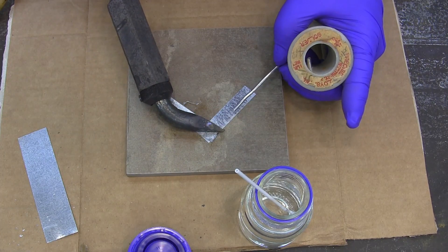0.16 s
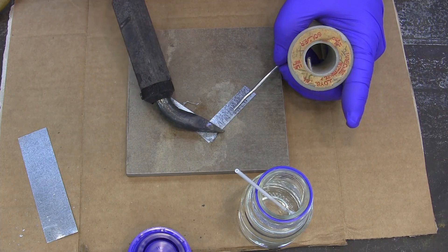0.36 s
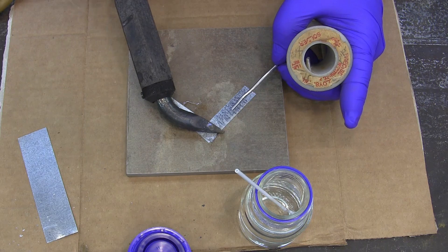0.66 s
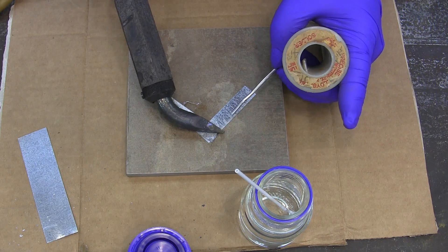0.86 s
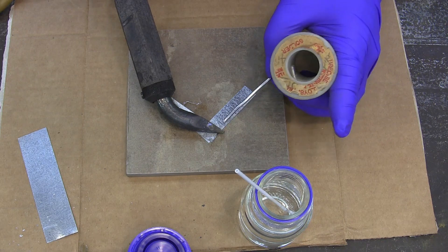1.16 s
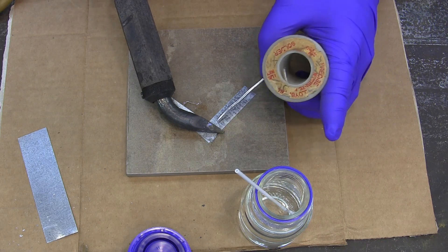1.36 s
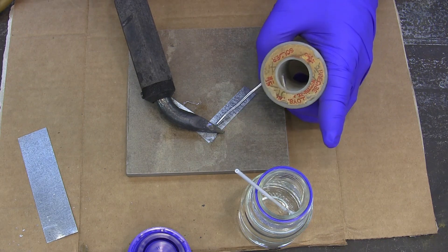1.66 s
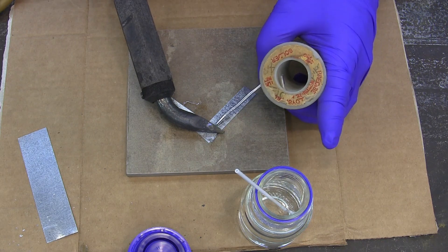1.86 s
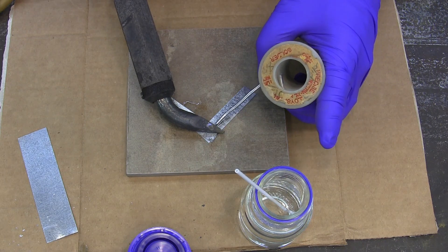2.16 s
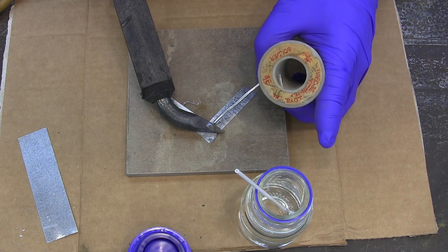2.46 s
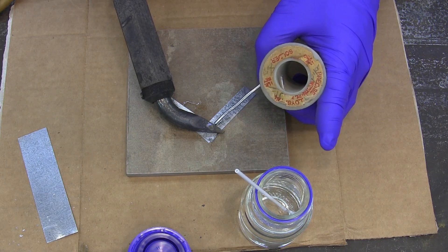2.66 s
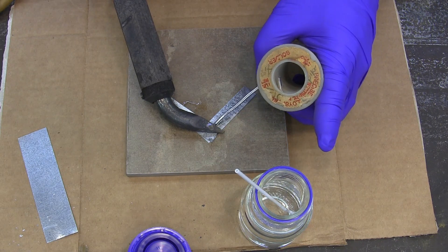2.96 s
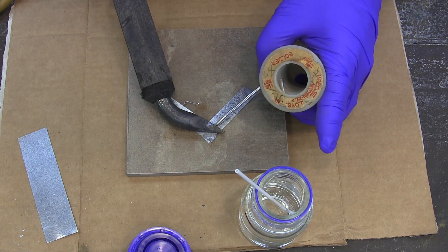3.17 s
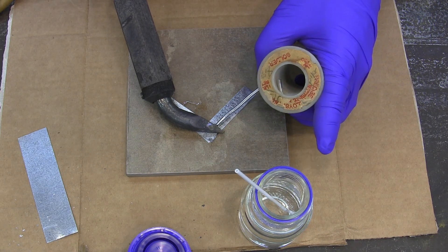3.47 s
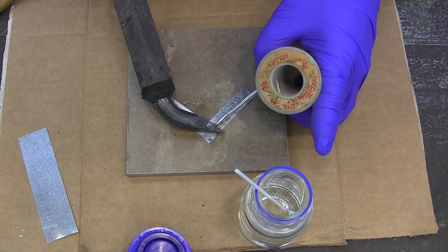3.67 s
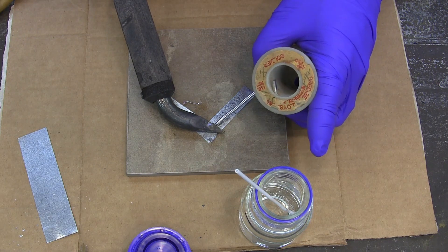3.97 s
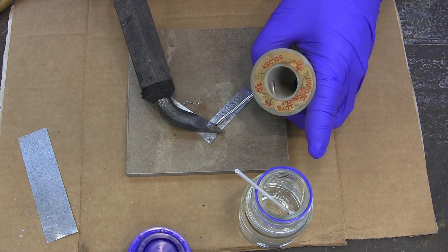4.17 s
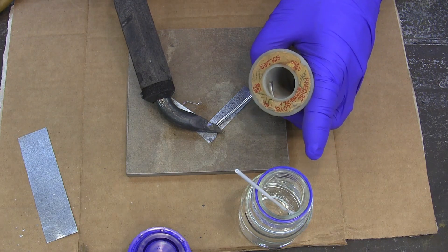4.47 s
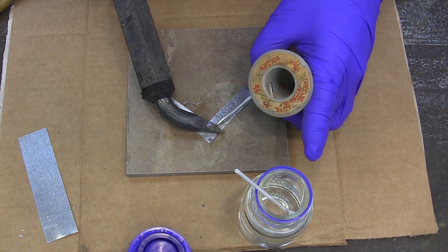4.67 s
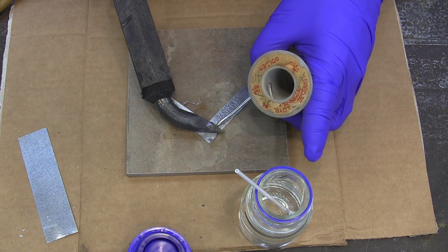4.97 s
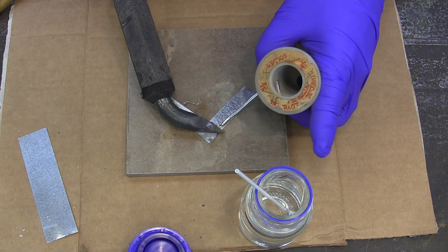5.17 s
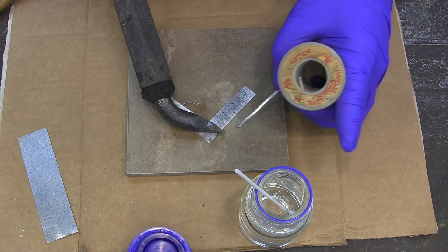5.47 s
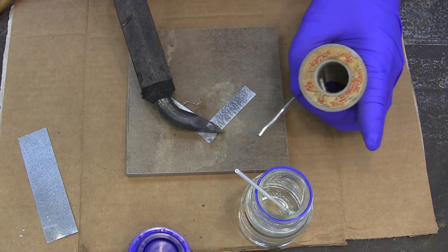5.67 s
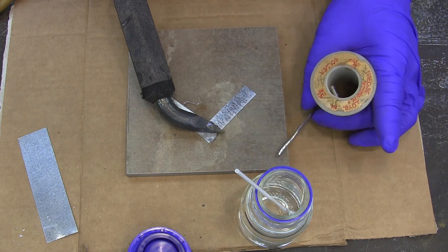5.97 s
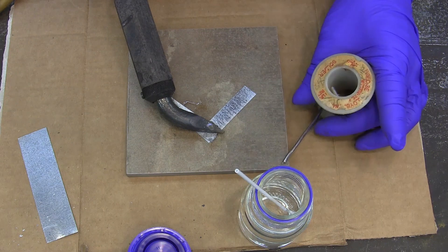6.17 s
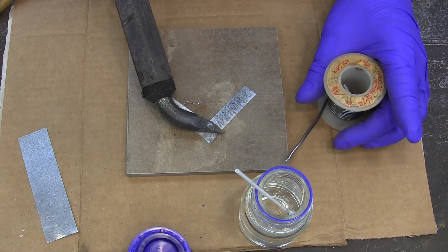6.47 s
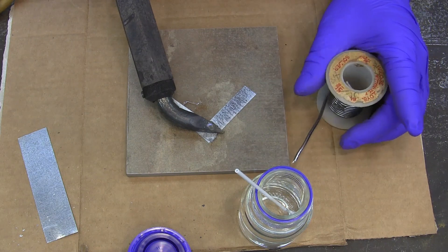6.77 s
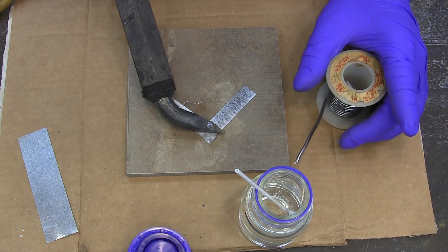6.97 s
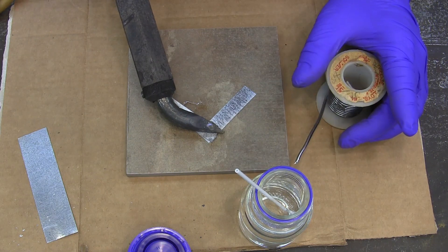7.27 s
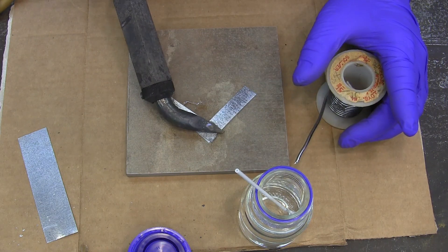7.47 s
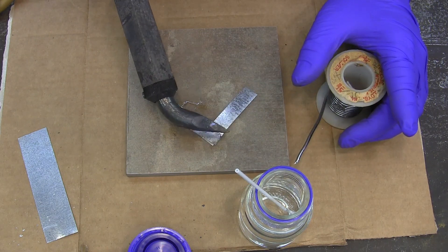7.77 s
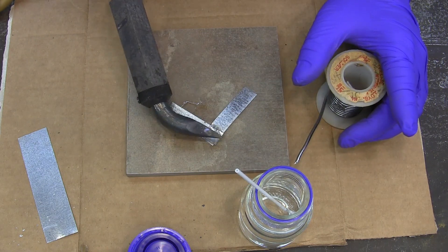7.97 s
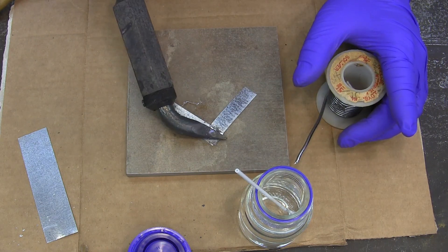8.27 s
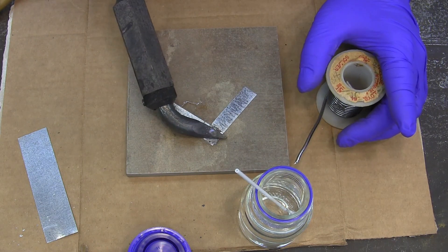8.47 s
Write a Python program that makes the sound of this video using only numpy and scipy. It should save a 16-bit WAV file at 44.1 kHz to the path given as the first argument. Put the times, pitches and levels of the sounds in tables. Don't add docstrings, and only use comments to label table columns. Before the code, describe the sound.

Close overhead microphones in a quiet workshop catch flux boiling under a soldering iron on sheet metal. A fine high hiss simmers, swells around two and a half seconds, then spits and crackles in sharper bursts through the middle. Tiny steam whistles slip through. The sizzle stops near seven and a half seconds; the strip scrapes and rattles lightly, flux spits again, and the iron knocks the board with small bounces.

```python
import sys
import numpy as np
from scipy import signal
from scipy.fft import rfft, irfft, next_fast_len
from scipy.io import wavfile
from scipy.ndimage import map_coordinates

SR = 44100
rng = np.random.default_rng(int(sys.argv[2]) if len(sys.argv) > 2 else 0)


def master(y):
    cut = np.clip(np.atleast_2d(y).T, -1, 1)
    pcm = np.round(cut * 32767)
    wavfile.write(sys.argv[1], SR, pcm.astype(np.int16))


def makeup_ratio(level_db):
    decades = np.asarray(level_db, float) / 20
    return 10 ** decades


N = 379701
TIME = np.arange(N) / SR
FFT_SIZE = next_fast_len(N + SR // 2)
HZ = np.fft.rfftfreq(FFT_SIZE, 1 / SR)


def unit(x):
    return x / np.sqrt(np.mean(x ** 2) + 1e-20)


def along(points, hz):
    f, v = np.transpose(points)
    return np.interp(np.log(hz + 1), np.log(f + 1), v)


def wobble(rate_hz):
    knots = rng.standard_normal(int(N * rate_hz / SR) + 4)
    return map_coordinates(knots, [np.arange(N) * rate_hz / SR])


def filtered(x, response):
    return irfft(rfft(x, FFT_SIZE) * response, FFT_SIZE)[..., :N]


def causal(spectrum):
    cepstrum = irfft(np.log(makeup_ratio(np.maximum(along(spectrum, HZ), -70))))
    cepstrum[1:len(HZ) - 1] *= 2
    cepstrum[len(HZ):] = 0
    return np.exp(rfft(cepstrum))


def snap(spectrum):
    response = causal(spectrum)
    return response / np.abs(irfft(response)).max()


def above(hz, steep=6):
    return 1 / (1 + (hz / (HZ + 1)) ** steep)


def band(hz, width_hz):
    return 1j * HZ * width_hz / (hz * hz - HZ * HZ + 1j * HZ * width_hz)


def strikes(times, db):
    return np.bincount(np.round(np.asarray(times) * SR).astype(int), makeup_ratio(db), N)[:N]


def ring(hz, db, t60):
    t = np.arange(SR // 4) / SR
    return makeup_ratio(db - 60 * t / t60) * np.sin(2 * np.pi * hz * t) * (1 - np.exp(-t / 0.00069))


# f/Hz, level/dB per Hz
HUM = [(20, 8.5), (30, 6.5), (55, -21), (100, -7), (160, -3), (350, -2.5), (480, -3), (750, -5), (1230, -9),
       (2000, -11.5), (3600, -13), (8000, -22), (15800, -29)]
# f/Hz, correlation
ALIKE = [(30, .78), (100, 0.21), (300, .25), (700, .35), (1500, .6), (4000, 0.73), (12000, 0.13)]
# t/s, level/dB, half-length/s
SWELLS = [
    (0.502, 3.5, 0.33),
    (3.095, 2, 0.28),
    (6.2, 1, 0.18),
]
HUM_DB, RISE_DB_PER_S = -60, .3


def hum():
    turn = np.arccos(np.clip(along(ALIKE, HZ), -1, 1)) / 2
    stir_db = RISE_DB_PER_S * TIME
    stir_db = stir_db + sum(db * np.exp(-((TIME - s) / half) ** 2) for s, db, half in SWELLS)
    air = rng.standard_normal((2, N)) * makeup_ratio(stir_db + 0.86 * wobble(5))
    mid, side = filtered(air, makeup_ratio(along(HUM, HZ)) * [np.cos(turn), np.sin(turn)])
    return makeup_ratio(HUM_DB) * unit(np.array([mid + side, mid - side]))


# f/Hz, t60/s
SHOP = [(150, 0.51), (1000, 0.42), (4000, 0.16), (12000, 0.19)]


def shop(x):
    hz, t, z = signal.stft(rng.standard_normal((2, SR // 2)), SR, nperseg=256)
    decay = makeup_ratio(-60 * t / along(SHOP, hz)[:, None])
    tail = signal.istft(z * decay, SR, nperseg=256)[1]
    late = np.pad(x, (300, 0))[None]
    return signal.fftconvolve(late, tail / np.linalg.norm(tail[0]), axes=1)[:, :N]


# t/s, peak level/dB
THUDS = [(2.5, -61), (3.128, -63), (3.8, -63), (5.33, -63), (5.74, -62), (6.2, -59), (6.44, -59),
         (6.8, -61), (7.08, -61), (7.42, -61), (7.93, -60), (7.79, -58), (7.83, -58), (8.285, -51.5),
         (8.35, -61), (8.411, -49), (8.481, -59)]
# f/Hz, level/dB, t60/s
BENCH = [(72, -11, .25), (93.2, -5, .3), (137.5, -8, .2), (170, -13, .15), (288, -11, 0.09)]


def bench():
    boom = sum(ring(*mode) for mode in BENCH)
    return signal.fftconvolve(strikes(*np.transpose(THUDS)), boom)[:N]


# f/Hz, level/dB per Hz
BOARD = [(35, -48), (130, -7), (1310, 3), (2090, -10), (3040, -5), (3670, -23), (4640, -25), (5090, -12),
         (7060, -8), (8320, -13.5), (10800, -10), (12400, -28), (16000, -45)]
KNOCK_S, KNOCK_PEAK_DB = 8.408, -7.5


def knock():
    return -filtered(strikes([KNOCK_S], [KNOCK_PEAK_DB]), snap(BOARD))


# t/s, level/dB
BOUNCES = [
    (8.4145, -31),
    (8.4185, -37),
    (8.4328, -31),
    (8.4375, -39),
    (8.4447, -30),
    (8.4482, -28),
    (8.457, -38),
    (8.465, -43),
]
# f/Hz, width/Hz, level/dB
SLAB = [(480, 90, 3), (614, 90, 2.5), (950, 140, 6), (1210, 110, -2), (1390, 170, 2), (1590, 200, -6),
        (1950, 300, -8), (2900, 1200, -12), (270, 120, -5)]
SHUDDER_DB, SHUDDER_T60_S, SHUDDER_PEAK_S, BOUNCE_DB = -38, .3, .028, 19


def settling():
    s, db = np.transpose(BOUNCES)
    since = TIME - KNOCK_S
    grit_db = SHUDDER_DB - 60 * np.abs(since - SHUDDER_PEAK_S) / SHUDDER_T60_S + 2.5 * wobble(150)
    grit = (since > 0) * makeup_ratio(grit_db) * rng.standard_normal(N)
    body = 0
    for k, (hz, width_hz, level_db) in enumerate(SLAB):
        body = body + (-1) ** k * makeup_ratio(level_db) * band(hz, width_hz)
    return filtered(grit + strikes(s, db + BOUNCE_DB), body)


# t/s, level/dB, f/Hz, t60/s
PINGS = [(3.128, -38.5, 2240, 0.044), (3.128, -50, 6530, .05), (6.1118, -31, 2560, 0.029),
         (6.1115, -41, 6470, .05), (7.585, -55, 730, .04), (8.032, -55, 720, .04), (7.838, -50, 6449, .09),
         (7.866, -48, 6440, .09), (4.835, -44.5, 1710, .06), (4.835, -40, 2720, 0.044),
         (4.837, -45, 3400, .04), (4.837, -39, 5600, .04)]


def pings():
    return sum(signal.fftconvolve(strikes([s], [db]), ring(hz, 0, t60))[:N] for s, db, hz, t60 in PINGS)


# t/s, middle modes level/dB, low modes rel/dB, top modes rel/dB, crack rel/dB
RATTLE = [(7.7825, -50, 0, -3, 8), (7.785, -41, 4, 3, 11), (7.8175, -48, 9, -12, 6),
          (7.829, -39, -4, 3, 10), (7.836, -46, 7, -2, 11), (7.8382, -46, 6, -4, 11),
          (7.8478, -40, -5, 6, 10), (7.856, -45, -3, 4, 7), (7.866, -45, -6, -4, 12), (7.883, -49, 0, 1, 8),
          (7.8945, -53, 0, 4.5, 4)]
# f/Hz, level/dB, t60/s
STRIP = [(2191, -4, .07), (2540, -2, .06), (3820, -12, .04), (4400, 0, .012), (6449, -10, .07),
         (7483, -4, .08), (7760, 5, .02), (8050, 8, .016), (8260, 5, .014), (9900, 0, .012),
         (12080, -5, .07), (13450, -14, .03)]
DRAG_S, DRAG_LENGTH_S, EDGE_S, DRAG_T60_S = 7.645, .1, 0.011, 0.023
DRAG_DB, DRAG_SWELL_DB, DRAG_LOW_DB = -74, 17, (12, 0)
CHATTER_DB, CHATTER_HZ = 1.5, 249.4


def strip():
    s, db, low_db, top_db, crack_db = np.transpose(RATTLE)
    done = np.clip((TIME - DRAG_S) / DRAG_LENGTH_S, 0, 1)
    touch = np.clip(np.minimum(TIME - DRAG_S, DRAG_S + DRAG_LENGTH_S - TIME) / EDGE_S, 0, 1)
    drag = touch * makeup_ratio(DRAG_DB + DRAG_SWELL_DB * done)
    drag_low_db = np.interp(done, (0, 1), DRAG_LOW_DB)

    crack_decay = makeup_ratio(-60 * np.arange(SR // 50) / SR / 0.008)
    grit = signal.fftconvolve(strikes(s, db + crack_db), crack_decay)[:N]
    colour = snap(BURST) * (0.76 + 0.27 * above(7600)) * (1 - .6 * np.abs(band(5500, 1500)))
    out = filtered(grit * rng.standard_normal(N), colour) * 0.55

    for hz, level_db, t60 in STRIP:
        tilt_db = low_db if hz < 4000 else top_db if hz > 10000 else 0
        push = strikes(s, db + tilt_db + 1.5 * rng.standard_normal(len(s)))
        rub_db = (drag_low_db if hz < 4000 else -5) - 21
        rub = drag * makeup_ratio(rub_db) * rng.standard_normal(N)
        sung = signal.fftconvolve(push, ring(hz, level_db - 5, t60))[:N]
        sung = sung + signal.fftconvolve(rub, ring(hz, level_db, DRAG_T60_S))[:N]
        out += sung * makeup_ratio(CHATTER_DB * wobble(CHATTER_HZ))
    return out


# start t/s, length/s, peak level/dB, first f/Hz, last f/Hz
JETS = [
    (.93, 0.19, -58, 2760, 2900),
    (5.805, .1, -52, 2750, 3000),
    (5.864, 0.074, -54, 2750, 2900),
    (5.885, .18, -47, 3200, 3500),
    (5.971, .12, -53.5, 3310, 3200),
    (6.365, .13, -59, 2064, 1950),
    (6.381, 0.11, -60, 1600, 1500),
    (6.345, .07, -56, 6000, 5800),
]
JET_WIDTH = (.15, .55, 0.116, .5, .4, .14, .3, .1)
JET_DROP_DB, JET_PEAK = 11.5, 0.44


def jets():
    out = np.zeros(N)
    for (s, length, db, first_hz, last_hz), width in zip(JETS, JET_WIDTH):
        done = np.clip((TIME - s) / length, 0, 1)
        blowing = (done > 0) & (done < 1)
        hz = first_hz + (last_hz - first_hz) * done
        place = np.cumsum(width * hz * blowing) / SR
        a, b = (map_coordinates(k, [place], order=1) for k in rng.standard_normal((2, SR)))
        phase = 2 * np.pi * np.cumsum(hz) / SR
        swell_db = db - JET_DROP_DB * ((done - JET_PEAK) / JET_PEAK) ** 2
        gain = blowing * makeup_ratio(swell_db + 1.1 * wobble(60))
        out += gain * (a * np.cos(phase) + b * np.sin(phase))
    return out


# t/s, peak level/dB
DEEP_POPS = [(3.1274, -34), (3.5581, -35), (3.5982, -38), (4.8372, -40), (5.3264, -33), (5.3452, -32),
             (6.201, -33), (7.4268, -34), (8.4035, -30), (8.4481, -38)]
# f/Hz, level/dB per Hz
DEEP = [(120, -20), (450, -4), (1500, 0), (2800, 0), (4500, -9), (9000, -24)]


def deep_pops():
    return filtered(strikes(*np.transpose(DEEP_POPS)), -snap(DEEP))


# t/s, peak level/dB
POPS = [(1.2457, -29), (2.5642, -26), (4.3731, -30), (4.3772, -30), (4.3798, -28), (4.384, -30),
        (4.8372, -29), (4.838, -32), (4.84, -33), (4.846, -31), (4.8642, -29), (4.8965, -34), (5.075, -28),
        (5.2436, -29), (5.2796, -33), (5.8258, -33), (6.005, -34), (6.0987, -37), (6.1526, -27),
        (6.1655, -28), (6.199, -27), (6.4505, -27), (6.4615, -27), (6.7043, -29), (7.8288, -26),
        (7.8478, -26), (8.4512, -24), (8.468, -27), (8.487, -33), (1.732, -28), (2.1382, -23.5),
        (3.147, -31), (3.1635, -19.5), (3.4036, -31), (3.5581, -26), (4.3865, -20.5), (4.8352, -32),
        (4.9204, -31), (4.9784, -24), (5.3046, -20), (5.3264, -21), (5.3452, -20.5), (5.3593, -23),
        (5.3615, -23), (5.7418, -25), (6.201, -24), (6.2189, -26), (6.4399, -21), (6.4444, -24),
        (6.4685, -22), (6.6622, -22), (6.7686, -20.5), (6.7766, -24), (6.8034, -22), (6.9105, -22),
        (7.0711, -24), (7.095, -28), (7.4268, -30), (7.4502, -35),
        (.8636, -31), (1.2248, -32), (3.1684, -30), (3.1996, -31), (3.2361, -31), (3.2768, -32),
           (3.2828, -31), (3.297, -31), (3.3069, -31), (3.5478, -30), (3.578, -28), (3.5982, -28),
           (4.4693, -29), (4.4732, -29), (4.6051, -28), (4.6159, -28), (4.7326, -28), (4.8387, -24),
           (4.8624, -27), (4.9902, -32), (4.9997, -29), (5.0386, -30), (5.0443, -31), (5.2808, -31),
           (5.3393, -26), (5.3465, -25), (5.353, -26), (5.3883, -26), (5.6709, -29), (5.7607, -33),
           (5.8451, -32), (6.437, -28), (6.4418, -31), (6.4468, -27), (6.4492, -26), (6.6331, -29),
           (6.7063, -29), (6.7222, -28), (6.7342, -27), (6.9417, -28), (6.9496, -28), (7.0495, -29),
           (7.1823, -31), (7.2578, -26), (7.3449, -36), (8.2725, -40), (8.2762, -40), (8.2845, -25),
           (8.2865, -28), (8.2883, -28), (8.2947, -26), (8.4035, -25), (8.59, -45), (8.598, -44)]
# t/s, peak level/dB
LAST_DROPS = [(8.293, -22), (8.2969, -27), (8.3011, -28), (8.304, -26), (8.3056, -31), (8.3089, -32),
              (8.3205, -37), (8.3816, -31), (8.3854, -29), (8.3878, -29), (8.3895, -32), (8.3998, -28),
              (8.4063, -24), (8.4124, -32), (8.4268, -35), (8.4311, -37), (8.4481, -29), (8.4541, -31),
              (8.46, -32), (8.4626, -33), (8.4672, -28), (8.4705, -31), (8.4734, -33), (8.4751, -33),
              (8.4775, -34), (8.4808, -35), (8.4862, -30), (8.5026, -37), (8.5064, -37), (8.5093, -38)]
STRAY_FROM_S, STRAY_TO_S, STRAY_LATE, STRAY_DB, STRAY_SPREAD_DB = .6, 6.7, .65, 12, 4


def pops(power, count=55):
    luck = rng.random((count, 2))
    stray_s = STRAY_FROM_S + (STRAY_TO_S - STRAY_FROM_S) * luck[:, 0] ** STRAY_LATE
    boil_db = 10 * np.log10(np.interp(stray_s, TIME, power[2]))
    stray_db = boil_db + STRAY_DB + STRAY_SPREAD_DB * luck[:, 1] ** 2
    s, db = np.hstack([np.transpose(POPS + LAST_DROPS), [stray_s, stray_db]])
    clicks = strikes(s, db - 2.4) - strikes(s + 0.00055, db - 22)
    return filtered(clicks, snap(BURST) * (0.62 + 0.4 * above(2300, 4)))


# t/s, level/dB, bubble size step/dB
SIMMER = [(0, -55, 2), (.2, -52.5, 0), (1.0, -54.5, 2), (1.67, -53, -1), (2.44, -46.5, 0), (2.8, -48.8, -2),
          (3.5, -49.5, -1), (3.8, -52, 1.5), (4.05, -48, 0), (4.35, -47.5, -2.5), (4.78, -49.3, -2),
          (5.27, -54.5, -4), (5.8, -56.5, -3), (6.43, -56.5, -4), (6.45, -49, -.5), (7.1, -49.5, 0),
          (7.3, -57, 1.5), (7.42, -80, 3)]
# peak t/s, peak level/dB, rise/(s per 10 dB), fall/(s per 10 dB), size step/dB
SURGES = [(.4, -53, .15, .4, 9), (1.0, -57, .2, .17, 14), (1.4, -51.5, .25, .4, -1),
          (2.57, -49, .02, .02, 0), (3.128, -59, .002, .02, 19), (3.17, -50, .02, .012, -1.5),
          (3.557, -54, .004, .014, 15), (4.376, -42, .008, .012, 2), (4.385, -43, .02, .004, 0),
          (4.836, -40, .002, .02, 1), (4.866, -44.5, .04, .012, 0), (4.921, -48, .003, .005, 2),
          (5.047, -49, .006, .004, 2), (5.122, -52, .004, .005, 0), (5.08, -55.5, .1, .08, -4),
          (5.28, -49.5, .003, .1, 4), (5.355, -42, .04, .03, 4), (5.41, -49, .03, .35, -1.5),
          (5.625, -48.5, .15, .11, 0), (5.96, -54, .1, .1, 2), (6.115, -50, .02, .025, 6),
          (6.153, -46.5, .002, .06, 5), (6.205, -45, .05, .04, 6), (6.27, -55, .04, .05, 5),
          (6.446, -44, .005, .12, 3), (7.25, -48.5, .008, .1, -2.5)]
# peak t/s, peak level/dB, rise/(s per 10 dB), fall/(s per 10 dB), size step/dB
SPITS = [(7.4205, -51, .001, .002, -2), (7.4237, -54, .001, .002, -4), (7.427, -57, .001, .035, 5),
         (7.433, -49, .002, .003, -6), (7.52, -69.5, .05, .25, -4), (7.758, -62, .001, .004, 14),
         (7.845, -56, .025, .06, 4), (8.274, -54, .002, .02, 0), (8.284, -40, .001, .014, 1),
         (8.293, -36.5, .008, .008, 2.5), (8.307, -45, .012, .003, 2), (8.32, -56, .01, .03, 0),
         (8.378, -45, .002, .05, -5), (8.395, -46, .02, .01, 0), (8.406, -38, .006, .003, 6),
         (8.415, -44, .003, .012, 2), (8.449, -46, .002, .02, 4), (8.47, -47, .02, .02, 2),
         (8.487, -49, .004, .02, 2), (8.515, -53, .03, .012, 0), (8.55, -62, .03, .3, -2),
         (8.33, -62, .01, .1, 6)]
COARSE_DB, MEDIUM_DB, FINEST_DB = -14, -7.5, -6
MEDIUM_GROWS, FINEST_GROWS = 0.61, -0.04


def boiling(size=16):
    grows = np.array([[1], [MEDIUM_GROWS], [0], [FINEST_GROWS]])
    base_db = np.array([[COARSE_DB], [MEDIUM_DB], [0], [FINEST_DB]])
    s, level_db, size_db = np.transpose(SIMMER)
    level_db, size_db = np.interp(TIME, s, level_db), np.interp(TIME, s, size_db)
    calm = makeup_ratio(level_db + base_db + grows * size_db) ** 2

    t = TIME[::size]
    events = SURGES + SPITS
    gain = []
    for s, db, rise, fall, _ in events:
        below_db = 10 * np.maximum((s - t) / abs(rise), (t - s) / abs(fall))
        gain.append(makeup_ratio(db - below_db) ** 2)
    class_power = makeup_ratio(base_db + grows * np.transpose(events)[4]) ** 2
    wild = np.repeat(class_power @ np.array(gain), size, axis=1)[:, :N]
    power = calm + wild
    return power, wild[2] / power[2]


# f/Hz, level/dB per Hz
BURST = [(350, -41.5), (700, -13), (1200, -8), (2050, -7.5), (2450, -11), (2800, -4), (3700, -6),
         (4100, -8), (4800, -2.5), (7100, 0), (10500, -4.5), (11800, -6), (13200, -9), (15600, -19)]
CALM_DB, WILD_DB = 1.5, 3
THIN_S, THIN_SPAN_S, THIN_DB, THIN_TOP_HZ = 6.1, .5, 5.5, 12600


def sizzle(power, surging):
    luck = rng.random((3, N))
    spiky_db = np.clip(CALM_DB + (WILD_DB - CALM_DB) * surging, 0, 3.5)
    size_db = -spiky_db * np.log(1 - .995 * luck[0])
    bursts = (luck[1] < .12) * np.sign(luck[2] - .5) * makeup_ratio(size_db)
    bursts *= np.sqrt(1 - spiky_db * np.log(10) / 10)
    stream = unit(bursts) + .5 * rng.standard_normal(N)
    stream *= makeup_ratio(0.36 * wobble(18) + 0.5 * wobble(60))

    colour = causal(BURST)
    low, mid, top = above(2125, 9.5), above(4390, 17.0), above(9070, 9.3)
    thinned = makeup_ratio(THIN_DB * (1 + np.tanh((TIME - THIN_S) / THIN_SPAN_S)) / 2) - 1
    film = unit(filtered(stream, colour * top * (1 - above(THIN_TOP_HZ, 22))))
    out = thinned * np.sqrt(power[3]) * film
    for share, p in zip([1 - low, low - mid, mid - top, top], power):
        out += np.sqrt(p) * unit(filtered(stream, colour * share))
    return out


# f/Hz, width/Hz, share
SEAM = [(2105, 140, 0.16), (2440, 200, -0.16), (2610, 140, 0.33), (3570, 120, -.3), (3760, 120, 0.45),
        (3980, 130, -0.53), (4190, 200, 0.35), (4570, 170, 0.2), (5140, 140, -.2), (5490, 100, -0.19),
        (6020, 100, -0.17), (8980, 210, -0.43), (11900, 180, -.35), (12790, 150, .35)]
# delay/ms, share
ECHOES = [(1.77, -0.004), (2.4, 0.034), (2.53, -0.013), (6.21, 0.036), (8.5, -0.064), (8.59, .08)]


def nearby(x):
    seam = 1 + sum(share * band(hz, width_hz) for hz, width_hz, share in SEAM)
    echo = 1 + sum(share * np.exp(-2j * np.pi * HZ * ms / 1000) for ms, share in ECHOES)
    return filtered(x, seam * echo)


# f/Hz, level/dB
TILT = [(1500, -38), (4000, -29), (8000, -29), (15000, -29)]
ASIDE_DB = 9


def scene():
    power, surging = boiling()
    flux = nearby(sizzle(power, surging) + pops(power) + deep_pops() + jets())
    metal = strip() + pings() + settling()
    blow = knock() + bench()
    walls = 1 - .62 * above(1500, 2.1)
    far = filtered(makeup_ratio(-15) * (flux + metal) + makeup_ratio(-18) * blow, walls)
    apart = filtered(flux + makeup_ratio(ASIDE_DB) * (metal + blow), makeup_ratio(along(TILT, HZ))) * [[-1], [1]]
    return flux + metal + blow + apart + shop(far) + hum()


def top_cut(x):
    return signal.sosfilt(signal.butter(12, 16460, fs=SR, output="sos"), x)


TOP_HZ = 15800


def record(dry):
    bass_cut = signal.freqs(*signal.butter(2, 90, "high", analog=True), HZ)[1]
    heard = filtered(dry, bass_cut * (HZ < TOP_HZ))
    return top_cut(heard - .0005)


dry = scene()
out = record(dry)
master(out)
```